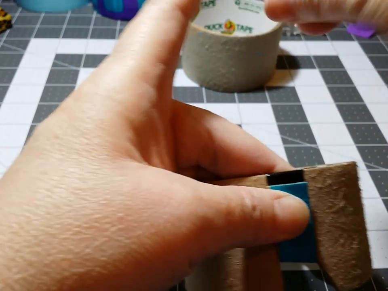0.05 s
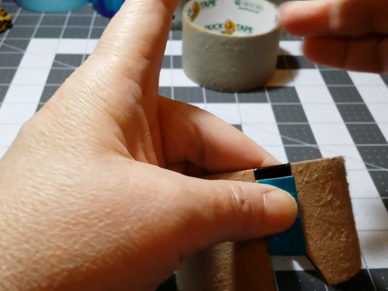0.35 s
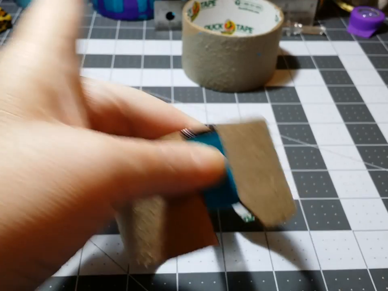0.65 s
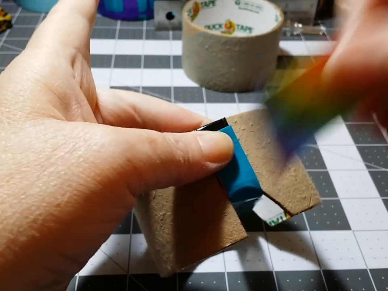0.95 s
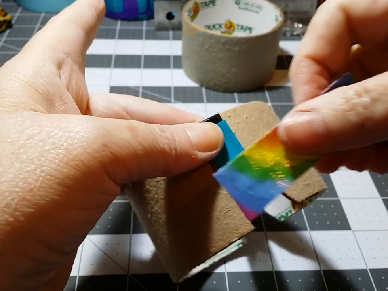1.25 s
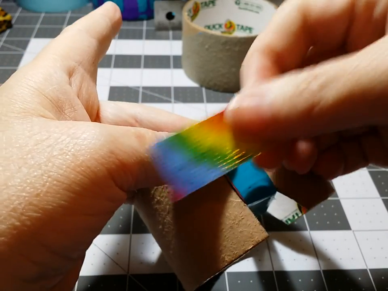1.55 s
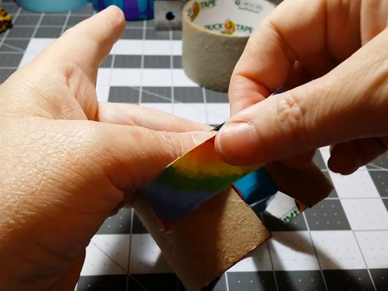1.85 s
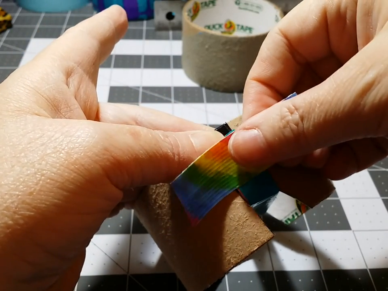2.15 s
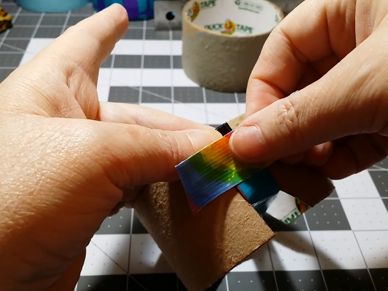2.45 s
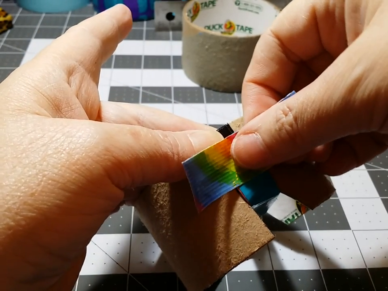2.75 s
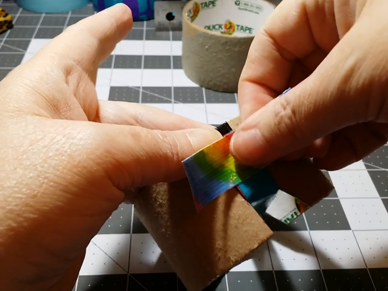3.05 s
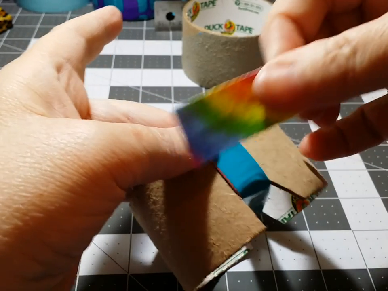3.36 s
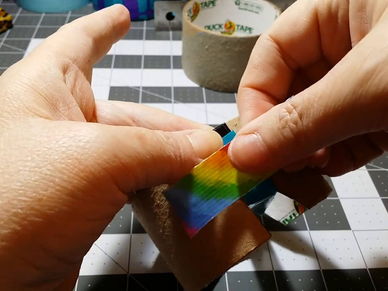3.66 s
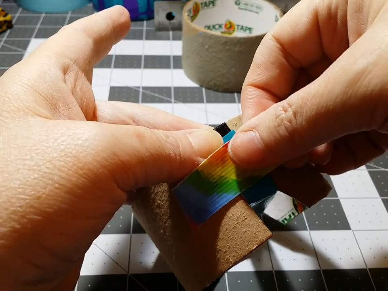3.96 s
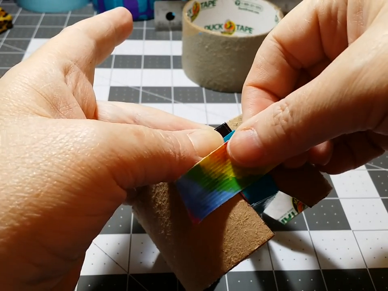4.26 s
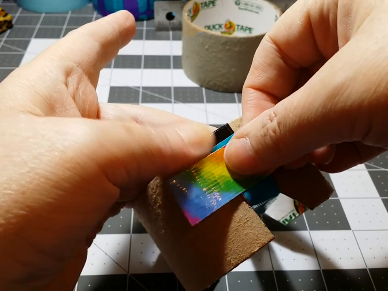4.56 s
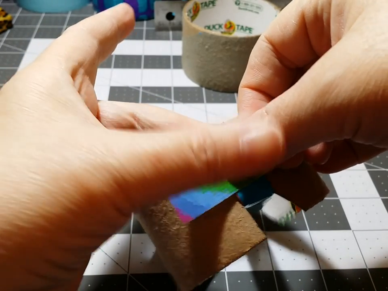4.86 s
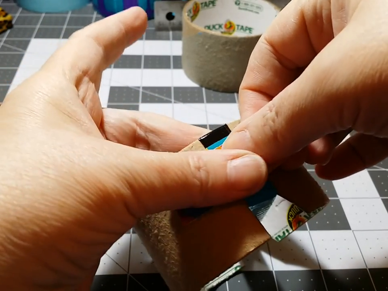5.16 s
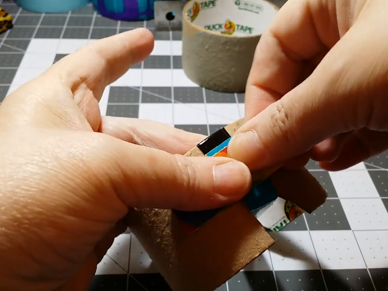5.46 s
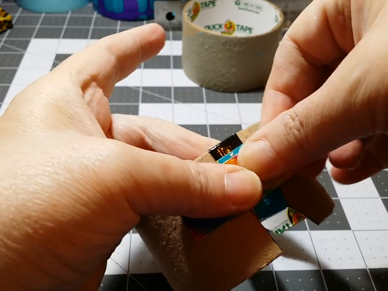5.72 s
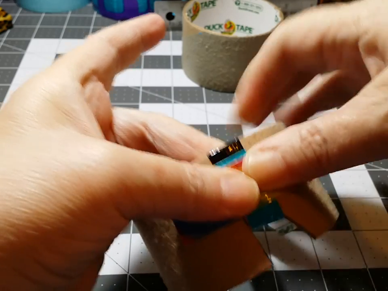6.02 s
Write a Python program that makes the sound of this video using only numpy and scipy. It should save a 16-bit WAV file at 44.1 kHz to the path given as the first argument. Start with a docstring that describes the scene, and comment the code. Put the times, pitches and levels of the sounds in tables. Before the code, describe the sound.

Fingers press and rub tape onto cardboard with small sticky ticks, soft bumps and one quick peel, over a steady fan hum.

```python
"""A fan hums steadily in a quiet room. Close to the microphone, fingers lay a strip of cloth tape on
a small cardboard form: skin brushes over tape and card, the adhesive ticks as it catches, the hands
bump the form softly. At 3.1 s the tape is pulled off, slips four times and rips free, the loose strip
ringing lower as it lengthens. More strokes and ticks follow, with a last flick and bump near 6.1 s."""
import sys
import numpy as np
from scipy import signal
from scipy.fft import rfft, irfft
from scipy.io import wavfile

SR = 44100
rng = np.random.default_rng(int(sys.argv[2]) if len(sys.argv) > 2 else 0)


def unload_wav(signal):
    """Save mono or channel-first audio to the path in sys.argv[1] as 16-bit WAV at rate SR, clipped to [-1, 1]."""
    wavfile.write(
        sys.argv[1],
        SR,
        np.round(np.clip(np.atleast_2d(signal).T, -1, 1) * 32767).astype(np.int16),
    )


N = 272979
TIME_S = np.arange(N) / SR
BINS_HZ = np.maximum(np.fft.rfftfreq(N, 1 / SR), 1)


def from_db(db):
    """Decibels to gain."""
    return 10 ** (np.asarray(db) / 20)


def unit_rms(x):
    """Scale to unit rms."""
    return x / np.sqrt(np.mean(x ** 2) + 1e-20)


def pan(balance_db):
    """Constant-power stereo gains; positive is left."""
    return unit_rms(from_db(np.array([[.5], [-.5]]) * balance_db))


def over_bins(points):
    """Interpolate a table over log frequency."""
    hz, value = np.transpose(points)
    return np.interp(np.log(BINS_HZ), np.log(hz), value)


def cut_bass(x, edge_hz, order=2):
    """Small faces radiate no bass."""
    return signal.sosfilt(signal.butter(order, edge_hz, "high", fs=SR, output="sos"), x)


def add(out, start_s, sound):
    """Mix in a stereo sound."""
    start = round(start_s * SR)
    out[:, start:start + sound.shape[1]] += sound[:, :N - start]


def resonate(x, modes, ratio=1):
    """Parallel resonances of alternating sign, normalised for noise power."""
    out, power = 0, 0
    for k, (hz, width_hz, db) in enumerate(modes):
        r = np.exp(-np.pi * width_hz / SR)
        zeros = np.array([1, 0, -1]) * (1 - r * r) / 2
        poles = [1, -2 * r * np.cos(2 * np.pi * hz * ratio / SR), r * r]
        out = out + (-1) ** k * from_db(db) * signal.lfilter(zeros, poles, x)
        power += from_db(db) ** 2 * (1 - r)
    return out / np.sqrt(power)


# Fan tones: pitch_hz, width_hz, level_db, stereo_phase_rad
FAN_TONES = [(65.6, 3.1, -61.5, 0.18), (104.4, 2.25, -55.5, 0.19), (171.4, 4.9, -54.5, 0.2),
             (239.2, 2.8, -57, 0.2), (290.4, 22, -65, 0.33), (345.4, 9.4, -62, 0.089),
             (459.4, 15.6, -66, 0.44), (760, 9.3, -64.5, 2), (803, 18, -65, 2.2), (1012, 4.3, -81.5, 1.5),
             (1112, 8.8, -71.5, 1.27)]
def fan_tones():
    """Narrow tones that wander in phase and strength."""
    out = np.zeros((2, N))
    for hz, width_hz, db, phase_rad in FAN_TONES:
        line = rfft(rng.standard_normal(N)) / (1 + ((BINS_HZ - hz) / width_hz) ** 2)
        ear_phases = np.exp(np.array([[.5j], [-.5j]]) * phase_rad)
        out += from_db(db) * unit_rms(irfft(line * ear_phases, N))
    return out


# Air rush and hiss: freq_hz, relative_db
AIR_SPECTRUM = [(25, -24), (43, -28), (62, -3.5), (130, 0.5), (260, -2), (400, -13), (520, -7.5),
                (700, -16), (1000, -13), (1400, -20), (2500, -24.5), (5500, -28.5), (9000, -27),
                (12000, -32.5)]
# Left-right likeness of the air: freq_hz, correlation
AIR_CORRELATION = [(60, 1), (290, 0.77), (480, 0.46), (700, 0.027), (1400, -0.18), (3000, 0.0047)]
# Wavering of the hum: time_s, relative_db
HUM_SWELL = [(0.0, -44), (0.14, -48), (3.34, -46.5), (3.45, -52.5), (3.64, -48.5), (5.21, -48),
             (6.19, -42.5)]
def fan(air_db=-51, hum_top_hz=450):
    """Tones over rushing air, alike at both ears in the bass and diffuse above."""
    mid, side = rfft(rng.standard_normal((2, N)))
    alike = over_bins(AIR_CORRELATION)
    noise = np.sqrt(1 + alike) * mid + np.sqrt(1 - alike) * side * [[1], [-1]]
    air = unit_rms(irfft(from_db(over_bins(AIR_SPECTRUM)) * noise, N))
    sound = from_db(air_db) * air + fan_tones()
    hum = signal.sosfiltfilt(signal.butter(2, hum_top_hz, fs=SR, output="sos"), sound)
    swell_db = np.interp(TIME_S, *np.transpose(HUM_SWELL))
    swell = from_db(swell_db - np.median(swell_db))
    return pan(balance_db=-3) * (sound + hum * (swell - 1))


def desk_echo(force, gain=.35, nearest_s=.00066, farthest_s=.0012, drift_s_per_s=.0033):
    """The desk returns each contact; the delay glides as the hands move."""
    n = np.arange(force.shape[1])
    lag = rng.uniform(nearest_s, farthest_s) * SR + drift_s_per_s * n
    earlier = np.round(n - lag).astype(int)
    return force + gain * (earlier >= 0) * force[:, np.clip(earlier, 0, n[-1])]


# Resonances of parting glue, tape face, card and taut loose strip: pitch_hz, width_hz, gain_db
TICK_MODES = [(9500, 4400, 0)]
TAPE_MODES = [(5520, 830, -9), (7000, 1050, -3.5), (8380, 940, 0), (9000, 880, 1.5), (10500, 2250, -7.5),
              (12600, 2600, -9.5)]
CARD_MODES = [(344, 170, 6), (808, 144, 8), (1190, 290, 3.5), (1540, 660, 2), (2164, 330, 9),
              (3265, 490, 8), (4220, 1100, 0), (5060, 290, 1)]
STRIP_MODES = [(2220, 87, 5.5), (2700, 180, 2), (3580, 260, 3), (4410, 840, 4), (5570, 450, 5.5)]
def taped_card(force, card_db, strip_db, tape_ratio=1, strip_ratio=1, tick_db=-40):
    """A contact ticks and rings tape, card and strip. Gains are relative to tape; ratios scale pitch."""
    force = desk_echo(force)
    tick = cut_bass(resonate(force, TICK_MODES), edge_hz=2200)
    tape = cut_bass(resonate(force, TAPE_MODES, tape_ratio), edge_hz=6000)
    card = cut_bass(resonate(force, CARD_MODES), edge_hz=200)
    taut_ratio = strip_ratio * (1 + .023 * rng.uniform(-1.3, 1))   # tension varies per contact
    strip = cut_bass(resonate(force, STRIP_MODES, taut_ratio), edge_hz=2150 * strip_ratio, order=6)
    # The tick is inverted so that it and the tape's ring add into one full, bright click.
    return tape - from_db(tick_db) * tick + from_db(card_db) * card + from_db(strip_db) * strip


def grains(size, rate_per_s, max_db):
    """Random impulses of slightly uneven strength."""
    strength_db = np.minimum(rng.exponential(1, size), max_db)
    return from_db(strength_db) * (rng.random(size) < rate_per_s / SR)


# Paper skin of the card: pitch_hz, width_hz, gain_db
PAPER_MODES = [(3555, 380, 0)]
def friction(peak_s, rise_s, fall_s, card_db, strip_db, squeak_db, squeak_hz,
             paper_db=-22, squareness=1.1, balance_db=-2):
    """Tiny slips, hiss and tacky catches swell and fade; the tape's ribs add a grainy whistle."""
    out = np.zeros((2, N))
    reach = np.where(TIME_S < peak_s, (peak_s - TIME_S) / rise_s, (TIME_S - peak_s) / fall_s)
    touching = np.flatnonzero(reach < 3)
    envelope = np.exp(-reach[touching] ** squareness)
    size = len(touching)
    slips = grains(size, rate_per_s=1800, max_db=4)
    catches = 7.7 * grains(size, rate_per_s=140, max_db=3)
    grit = unit_rms(slips * rng.choice([-1, 1], (2, size)))
    hiss = rng.standard_normal((2, size))
    force = grit + hiss + catches
    body = taped_card(force, card_db, strip_db) + from_db(paper_db) * resonate(force, PAPER_MODES)
    ribs = unit_rms(slips * rng.standard_normal((2, size)))
    squeak = resonate(ribs, [(squeak_hz, 760, 0)])
    sound = unit_rms(body) + from_db(squeak_db) * squeak
    out[:, touching] = pan(balance_db) * envelope * unit_rms(sound)
    return out


# Fingertip flicks: peak_s, fall_s, level_db
FINGER_FLICKS = [(.006, 0.025, -40.5), (5.787, 0.021, -37), (6.066, 0.059, -38.5)]
# Finger strokes: peak_s, length_s, level_db, card_db, paper_db, squeak_db, squeak_hz
FINGER_STROKES = [(0.162, 0.054, -51, -5.5, -20, -6, 6960), (0.224, 0.013, -53, -8, -22, -10, 8500),
                  (0.528, 0.031, -45, -6, -20, -6, 8400), (0.584, 0.043, -42, -6.5, -17, -4.5, 7100),
                  (1.549, 0.02, -56.5, -20, -20, -4, 8900), (1.663, 0.025, -47.5, -7, -24, -4, 9100),
                  (1.676, 0.0055, -35, -19, -22, -11, 10000), (1.741, 0.057, -54, -9, -20, -6, 8800),
                  (2.012, 0.38, -61.5, -17, -18, -3, 8700), (3.72, .05, -64, -16, -20, -6, 8900),
                  (4.521, 0.064, -52.5, -18, -11.5, -12, 9500), (4.573, 0.057, -50.5, -13, -16, -5, 10000),
                  (4.667, 0.014, -54.5, -5, -19, -1, 9050), (4.873, 0.041, -51.5, -6, -13, 0, 9300),
                  (4.96, 0.056, -53.5, -13, -7, 1, 8300), (5.012, 0.064, -55.5, -12, -16, -2, 9600),
                  (5.213, .16, -59, -6, -18, -5, 9200), (5.393, 0.026, -43.5, -4.5, -14, -5, 6500),
                  (5.443, 0.019, -53, -8, -16, -5, 8800), (5.779, 0.025, -45, 1, -16, 2, 8950),
                  (5.923, 0.026, -51, -3, -17, -11, 8900)]
def fingers():
    """Skin on tape and card: strokes swell and fade, flicks start fast and trail off."""
    out = np.zeros((2, N))
    for peak_s, length_s, db, card_db, paper_db, squeak_db, squeak_hz in FINGER_STROKES:
        out += from_db(db) * friction(
            peak_s, rise_s=.48 * length_s, fall_s=.52 * length_s, card_db=card_db, strip_db=-18,
            squeak_db=squeak_db, squeak_hz=squeak_hz, paper_db=paper_db, squareness=1.07)
    for peak_s, fall_s, db in FINGER_FLICKS:
        out += from_db(db) * friction(peak_s, rise_s=.005, fall_s=fall_s, card_db=-13, strip_db=-23.5,
                                      squeak_db=-8.5, squeak_hz=8800)
    return out


def crack(card_db, strip_db, tick_db, tape_ratio, strip_ratio, balance_db, shiver_s=.0015):
    """One sharp release, then a brief shiver in the strip; unit rms over 10 ms."""
    size = SR // 100
    shiver = unit_rms(rng.standard_normal(size) + rng.standard_normal((2, size)))
    force = .1 * shiver * np.exp(-np.arange(size) / SR / shiver_s)
    force[:, 0] += 1
    ring = taped_card(force, card_db, strip_db, tape_ratio, strip_ratio, tick_db)
    left, right = pan(balance_db) * unit_rms(ring)
    lag_samples = 5   # the left microphone port is nearer
    return np.array([np.pad(left, (0, lag_samples)), np.pad(right, (lag_samples, 0))])


# Single cracks: start_s, level_db, card_db, strip_db, tick_db, tape_ratio, strip_ratio, top_hz
ADHESIVE_SNAPS = [(0.2576, -41.5, -4.5, -12, -21, 1.39, 1.23, 17000),
                  (0.5235, -30.5, -13, -20, -22, 1.06, 1.05, 13000),
                  (1.6767, -42.5, -7, 0, 4, 0.7, 1.8, 17000), (1.6773, -42, -13, 3, 0, 1.12, 1.76, 17000),
                  (1.6818, -55, -22, -6, -3, 1.4, 1.3, 17000), (2.82, -41.5, -30, -3, -8, 0.96, 1.97, 8500),
                  (4.8838, -56, -9, -11, -5, 1.1, 1.1, 16000), (5.758, -33, -1, -20, -7, 1.18, 1.1, 12300),
                  (5.7587, -37, 11, -12, -10, 0.84, 1, 9100),
                  (5.7865, -27, -14, -14, -1, 0.97, 1.53, 12800),
                  (5.79, -41, -13, -15, 2, 0.79, 0.86, 14000)]
def snaps():
    """Adhesive lets go or card creases; a softer contact has less treble."""
    out = np.zeros((2, N))
    for start_s, db, card_db, strip_db, tick_db, tape_ratio, strip_ratio, top_hz in ADHESIVE_SNAPS:
        snap = crack(card_db, strip_db, tick_db, tape_ratio, strip_ratio, balance_db=-6)
        lowpass = signal.butter(4, top_hz, fs=SR, output="sos")
        add(out, start_s, from_db(db) * signal.sosfilt(lowpass, snap))
    return out


# Hands on the form: start_s, level_db, pitch_hz, t60_s
HAND_BUMPS = [(0.52, -29, 173, 0.14), (0.769, -33, 102.6, 0.28), (2.085, -30.5, 138, 0.23),
              (2.567, -30, 103, 0.16), (5.787, -36.5, 178.8, 0.46), (6.08, -36.5, 172.3, 0.45)]
def bumps(attack_s=.016):
    """Flesh meets card softly: a low, damped swing."""
    out = np.zeros(N)
    for start_s, db, hz, t60_s in HAND_BUMPS:
        age_s = np.maximum(TIME_S - start_s, 0)
        envelope = (1 - np.exp(-age_s / attack_s)) * from_db(-60 * age_s / t60_s)
        out += from_db(db) * envelope * np.sin(2 * np.pi * hz * age_s)
    return pan(balance_db=-7) * out


# Glue giving way: start_s, level_db, card_db, strip_db
PEEL_SLIPS = [(3.1017, -40.5, -10, -9), (3.1223, -28.5, -27, -4), (3.1372, -51, -18, -10),
              (3.14, -37, -21, 2), (3.141, -28, -17, -1), (3.1595, -29, -13, 0), (3.1636, -41, -22, -4),
              (3.1652, -40, -20, -7), (3.1685, -27, -23, -3), (3.17, -30, -19, 6), (3.1712, -25, -22, -1),
              (3.1722, -31.5, -32, -8), (3.174, -28, -14, -6)]
def peel(rip_s=3.172, sag_per_s=4):
    """Slips, then a run of cracks in a fizz of tearing glue; the lengthening strip rings lower."""
    fizz = friction(rip_s, rise_s=.0105, fall_s=.0045, card_db=-30, strip_db=-5,
                    squeak_db=-8, squeak_hz=6760, squareness=3, balance_db=-3)
    out = from_db(-31.5) * fizz
    for start_s, db, card_db, strip_db in PEEL_SLIPS:
        strip_ratio = 1 + sag_per_s * (rip_s - start_s)
        slip = crack(card_db, strip_db, tick_db=5, tape_ratio=.96, strip_ratio=strip_ratio, balance_db=-3)
        add(out, start_s, from_db(db) * slip)
    return out


# Microphone port balance: freq_hz, left_minus_right_db
PORT_BALANCE = [(1000, 6), (2200, 1), (3500, 1), (4500, -6), (6600, 9), (8500, -10), (10500, -8.5),
                (13000, -1.5)]
def microphone_ports(x):
    """The two ports colour close sounds differently."""
    gains = from_db(np.array([[.5], [-.5]]) * over_bins(PORT_BALANCE))
    gains /= np.sqrt(np.mean(gains ** 2, axis=0))
    return irfft(rfft(x) * gains, N)


def room(x, t60_s=.22, build_s=.003, top_hz=12400):
    """A short diffuse tail; the walls swallow the highest treble."""
    age_s = np.arange(SR // 2) / SR
    envelope = (1 - np.exp(-age_s / build_s)) * from_db(-60 * age_s / t60_s)
    tail = envelope * rng.standard_normal((2, len(age_s)))
    tail = signal.sosfilt(signal.butter(2, top_hz, fs=SR, output="sos"), tail)
    tail /= np.sqrt(np.sum(tail ** 2, axis=1, keepdims=True))
    return signal.fftconvolve(x, tail, axes=1)[:, :N]


def scene():
    """The fan, close hand work and its room tail."""
    background = fan()
    hands = snaps() + peel() + fingers() + bumps()
    return background + microphone_ports(hands) + from_db(-13) * room(hands)


def record(dry):
    """Steep low-pass at 14.6 kHz."""
    return signal.sosfilt(signal.ellip(10, .2, 80, 14600, fs=SR, output="sos"), dry)


dry = scene()
out = record(dry)
unload_wav(out)
```